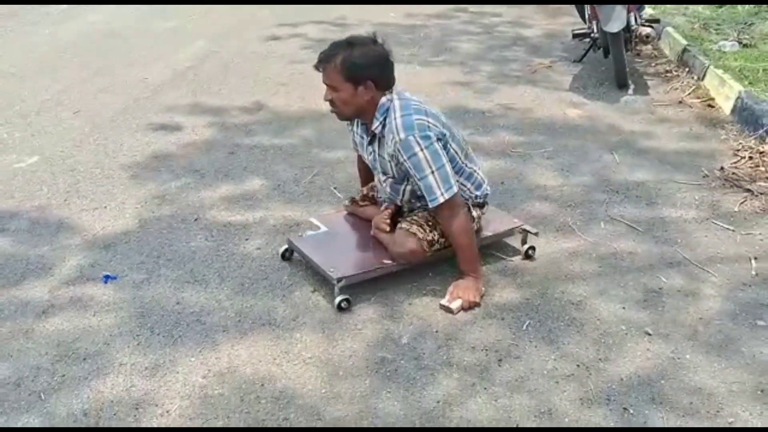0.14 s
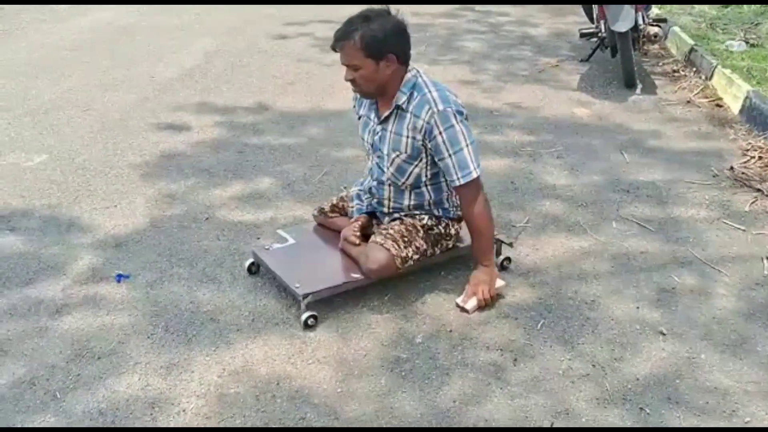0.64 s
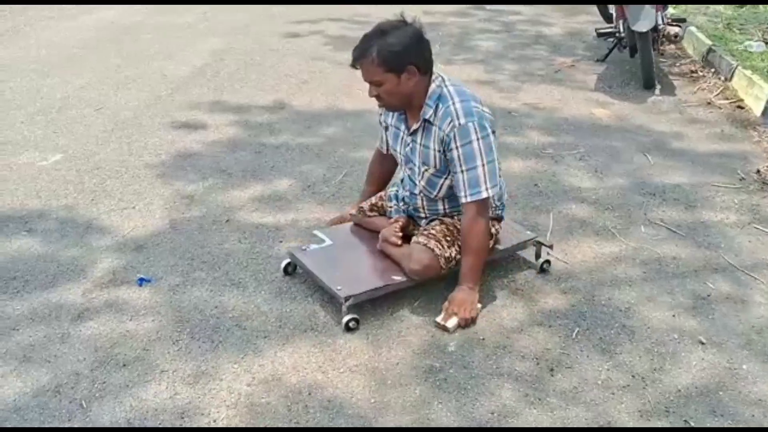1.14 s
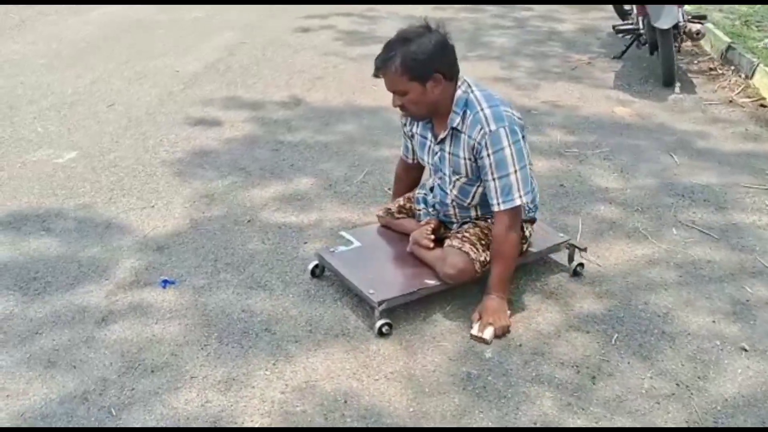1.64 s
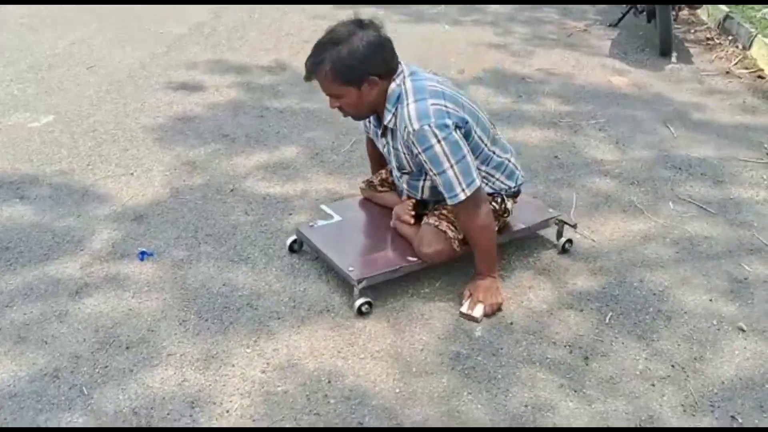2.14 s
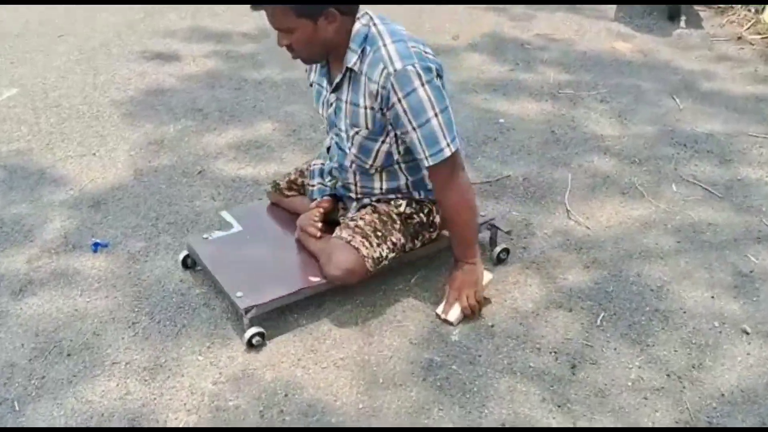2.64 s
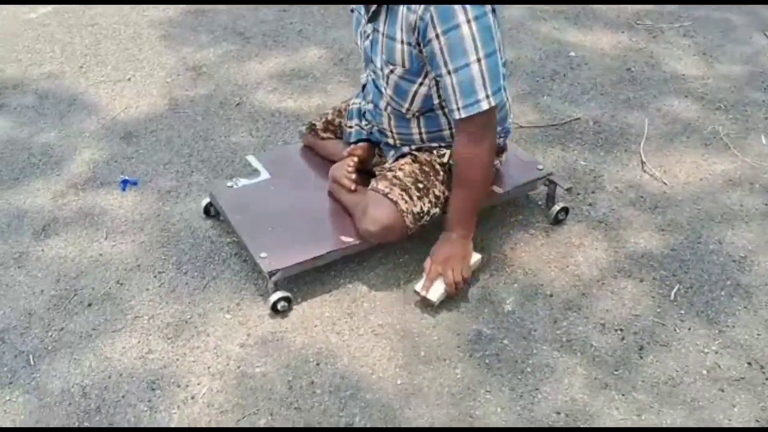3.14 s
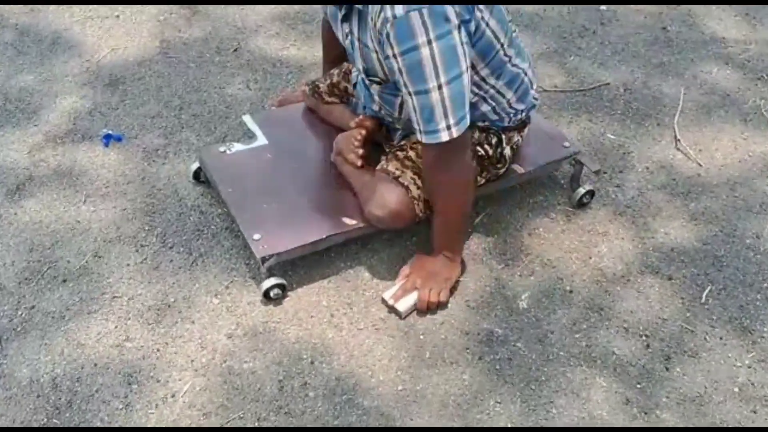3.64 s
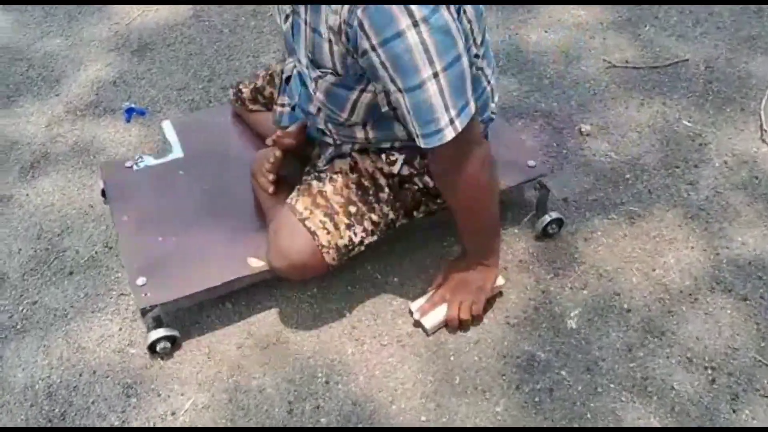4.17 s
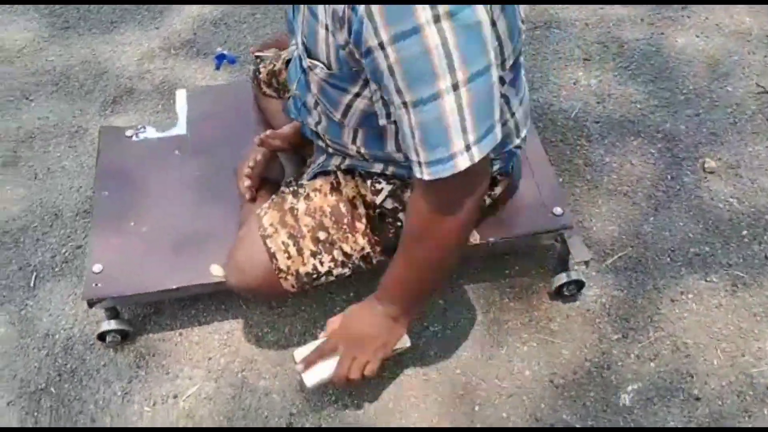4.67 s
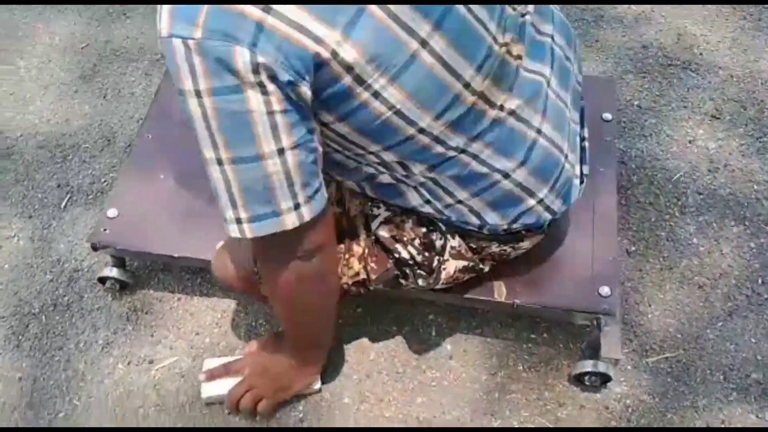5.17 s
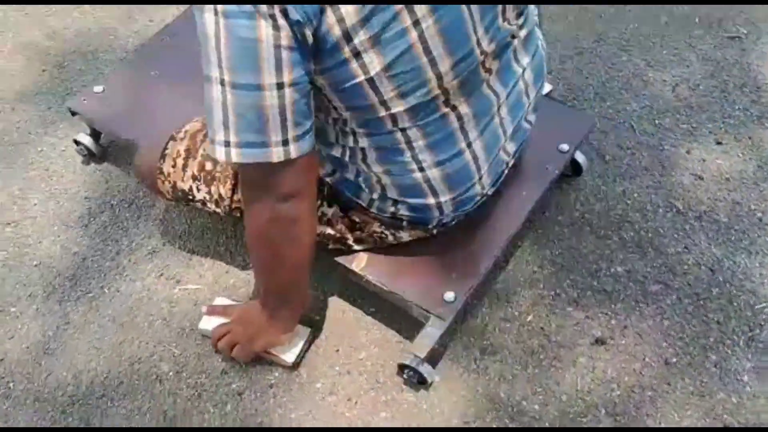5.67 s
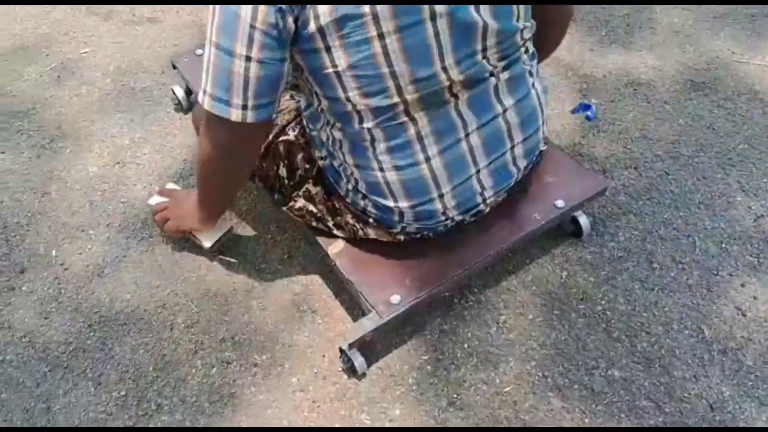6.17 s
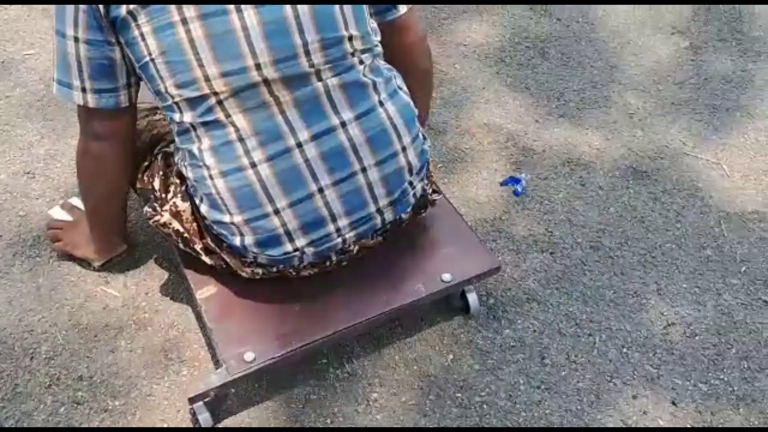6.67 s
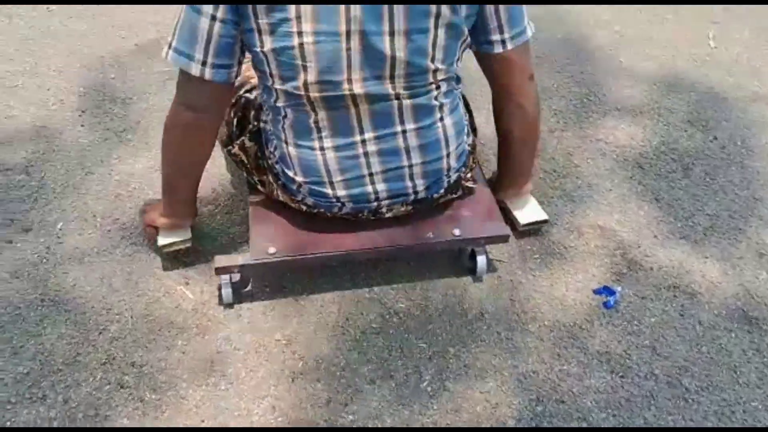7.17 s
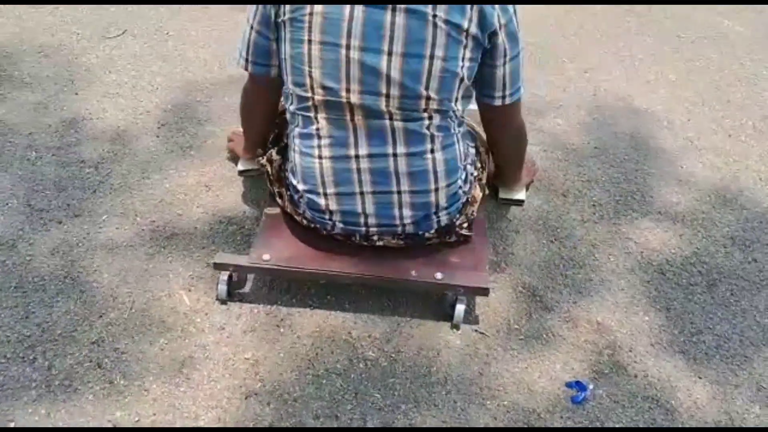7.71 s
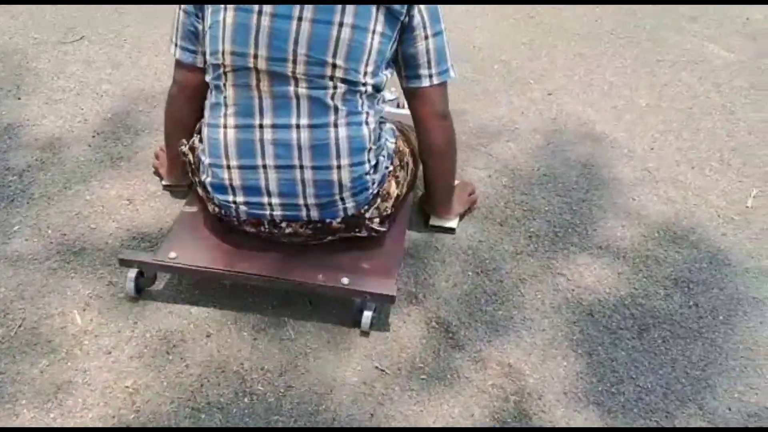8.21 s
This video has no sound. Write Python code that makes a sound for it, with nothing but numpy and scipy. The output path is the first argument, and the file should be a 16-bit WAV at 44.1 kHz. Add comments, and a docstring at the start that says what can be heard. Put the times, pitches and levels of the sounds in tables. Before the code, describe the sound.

Outdoors on a quiet, faintly humming street, close stereo microphones hear a loaded wooden board on four small metal casters. It rolls at once, stops, and in the pause hand blocks click and thud while the frame creaks. Further pushes follow, louder and boomier around the middle, with stones knocking the deck and steel chattering. A last, rattling push begins with the sharpest jolt.

```python
"""A loaded board on four small steel casters is pushed by hand over rough asphalt, in surges with pauses between.
Throughout, a quiet street hums and faint grit ticks. The first push rolls at once: filtered noise, shaken by
random stones, rings the board, its frame and casters, and larger stones add bursts. In the pauses the hand blocks
tap (click, ring and thud) and the frame creaks in short decaying notes. More pushes follow, with soft dips sounding
the hollow note, until the loudest jolt comes as the last push starts. Two close microphone ports hear it all."""
import sys
import numpy as np
from scipy import signal
from scipy.fft import rfft, irfft, next_fast_len
from scipy.io import wavfile
from scipy.ndimage import uniform_filter1d, map_coordinates

SR = 44100
rng = np.random.default_rng(int(sys.argv[2]) if len(sys.argv) > 2 else 0)


def volts_from_db(level):
    """Convert decibel levels to linear amplitude ratios."""
    exponent = np.asarray(level, float) / 20
    return 10 ** exponent


def to_wav(sig):
    """Store sig (one row per channel, or 1-D mono) as 16-bit WAV at the path in sys.argv[1].

    Samples outside -1..1 are clipped; the rate is SR.
    """
    pcm = np.clip(np.atleast_2d(sig), -1, 1) * 32767
    pcm = np.round(pcm).astype(np.int16)
    wavfile.write(sys.argv[1], SR, pcm.T)  # frames by channels


N = 366912


def unit(x):
    """Normalization: scaled to rms 1."""
    return x / np.sqrt(np.mean(np.abs(x) ** 2) + 1e-20)


def along(points, hz):
    """Logarithmic frequency scale: (Hz, value) points are interpolated along it."""
    f, v = np.transpose(points)
    return np.interp(np.log(hz + 1), np.log(f + 1), v)


def curves(rows):
    """Linear interpolation in time: one curve for each column after the time."""
    s, *columns = np.transpose(rows)
    return [np.interp(np.arange(N) / SR, s, column) for column in columns]


def wobble(rate):
    """Band-limited random modulation: a smooth curve with rate knots a second."""
    knots = rng.standard_normal(int(N * rate / SR) + 4)
    return map_coordinates(knots, [np.arange(N) * rate / SR])


def filtered(x, response):
    """Linear filtering: the spectrum times a complex response of frequency."""
    m = next_fast_len(N + SR // 2)
    return irfft(rfft(x, m) * response(np.fft.rfftfreq(m, 1 / SR)), m)[..., :N]


def modes(table):
    """Modal superposition: a causal sum of resonances that keeps the power of white noise."""
    def response(f):
        total = 0
        for k, (centre, width, db) in enumerate(table):
            resonance = 1j * f * width / (centre * centre - f * f + 1j * f * width)
            total = total + (-1) ** k * volts_from_db(db) * resonance
        return unit(total)
    return response


def patchy(x, depth_db):
    """Time-varying filtering: other bands stand out for a while, drawn at random."""
    z = signal.stft(x, nperseg=256)[2]
    field = uniform_filter1d(rng.standard_normal(z.shape), size=3, axis=-2)
    field = uniform_filter1d(field, size=18, axis=-1)
    return signal.istft(z * volts_from_db(depth_db * unit(field)), nperseg=256)[1][..., :N]


# street background spectrum: pitch_hz [Hz], level_db [relative dB per Hz]
STREET_SPECTRUM = [(15, -43), (25, -5.5), (92, -2.5), (256, -22), (714, -35.5), (988, -39.5), (1520, -33.5),
                   (2480, -32), (2690, -45), (5570, -35.5), (16000, -52)]
# left-right correlation of the background: pitch_hz [Hz], likeness [0-1]
STREET_LIKENESS = [(100, 0.5), (6000, 0.06)]
# slow coming and going of the hum: start_s [s], level_db [dB]
HUM_DRIFT = [(1, 0.5), (3.5, -4.5), (7.7, 1)]


def street():
    """Partial coherence: mid and side noise make far traffic hum and faint hiss, slowly wavering."""
    level_db = -59.5  # rms of the mid signal before the wavering
    angle = lambda hz: np.arccos(np.clip(along(STREET_LIKENESS, hz), -1, 1)) / 2
    pair = patchy(rng.standard_normal((2, N)), depth_db=3)
    spectrum = lambda hz: volts_from_db(along(STREET_SPECTRUM, hz)) * [np.cos(angle(hz)), np.sin(angle(hz))]
    mid, side = filtered(pair, spectrum)
    waver_db = 3 * wobble(5)
    both = volts_from_db(level_db + waver_db) * np.array([mid + side, mid - side]) / np.std(mid)
    hum = filtered(both, lambda hz: 1 / (1 + (hz / 300) ** 4))
    return both + (volts_from_db(curves(HUM_DRIFT)[0]) - 1) * hum


def thrum():
    """Amplitude modulation: deep noise swells with the rolling and differs from port to port."""
    noise = rng.standard_normal((2, N))
    low = filtered(noise, lambda hz: 1 / (1 + (hz / 100) ** 3) * hz / (hz + 60))
    return volts_from_db(-25.5) * boom_and_steel()[0] * unit(low)


# delay of the right port after the left, one value per wheel: lag_ms [ms]
WHEEL_LAG_MS = [.02, .08, .17, .27]


def ports(wheels):
    """Time-difference stereo: both ports hear every wheel, each with its own lag."""
    lag_s = np.array(WHEEL_LAG_MS)[:, None] / 1000
    # half the lag is an advance at the left, half a delay at the right
    left = filtered(wheels, lambda hz: np.exp(1j * np.pi * hz * lag_s))
    right = filtered(wheels, lambda hz: np.exp(-1j * np.pi * hz * lag_s))
    return np.array([left.sum(axis=0), right.sum(axis=0)])


# decay of scattered sound between board and road: pitch_hz [Hz], t60_s [s]
GAP_T60 = [(200, 0.13), (10000, 0.02)]
# its share of the sound: pitch_hz [Hz], level_db [dB]
GAP_SHARE = [(250, -24), (1100, -10), (2500, -3.5), (11000, 0.5)]


def gap(x):
    """Diffuse reverberation: sound scattered between board and road differs at each port."""
    hz, t, z = signal.stft(rng.standard_normal((len(x), 2, SR // 8)), SR, nperseg=128)
    fading = volts_from_db(-60 * t / along(GAP_T60, hz)[:, None])
    tail = signal.istft(z * fading, SR, nperseg=128)[1]
    tail = tail / np.linalg.norm(tail, axis=-1, keepdims=True)
    wet = signal.fftconvolve(x[:, None], tail, axes=2)[..., :N].sum(axis=0)
    return filtered(wet, lambda f: volts_from_db(along(GAP_SHARE, f)))


def stones(per_s, spread_db):
    """Poisson process: random bumps per wheel, their heights spread exponentially in dB up to a cap."""
    where, size = rng.random((2, len(WHEEL_LAG_MS), N))
    height_db = np.minimum(-spread_db * np.log(size + 1e-9), 1.1 * spread_db)
    return (where < per_s / SR) * volts_from_db(height_db)


def chatter(bumps, t60, rise, steady):
    """Impulse excitation: loose parts shake after each bump and settle, over a steady grind."""
    t = np.arange(SR // 8) / SR
    settling = volts_from_db(-60 * t / t60) * (1 - np.exp(-t / rise))
    shake = signal.fftconvolve(bumps, settling[None], axes=1)[:, :N]
    return (unit(shake) + steady) * rng.standard_normal(bumps.shape)


def bursts(times, peaks_db, t60, rise, push=0):
    """Exponential decay: dying puffs of noise, each on one wheel; push adds a one-sided shove."""
    out, t = np.zeros((len(WHEEL_LAG_MS), N + SR)), np.arange(SR // 10) / SR
    for k, (s, db) in enumerate(zip(times, peaks_db)):
        envelope = volts_from_db(db - 60 * t / t60) * (1 - np.exp(-t / rise))
        puff = envelope * (push + rng.standard_normal(len(t)))
        out[k % len(WHEEL_LAG_MS), round(s * SR):][:len(t)] += puff
    return out[:, :N]


def grit():
    """Granular contact: grains under the wheels give thin, dull ticks, 16 a second over all wheels."""
    grains = stones(per_s=16 / len(WHEEL_LAG_MS), spread_db=-0.5)  # nearly equal heights
    ticks = volts_from_db(-83) * chatter(grains, t60=0.022, rise=.001, steady=0)
    return filtered(ticks, lambda f: 1j * f / (1500 + 1j * f) / (1 + 1j * f / 9000))


# slips of the loaded frame, one joint per row: pitch_hz [Hz], t60_s [s],
# slips [list of start_s [s], level_db [dB]]
FRAME_SLIPS = [(1724, 0.057, [(1.36, -55), (1.38, -52), (1.412, -54.5), (1.703, -49.5), (1.765, -56.5),
               (1.83, -62)]), (1900, .04, [(2.955, -35.5), (2.97, -43.5), (3.0, -39.5), (3.03, -40.5),
               (3.046, -45), (3.065, -43.5), (8.141, -41.5)]), (2720, .018, [(1.2495, -42), (8.074, -33),
               (8.085, -38), (8.101, -34)])]


def creak():
    """Stick-slip friction: each slip snaps and rings a joint briefly, never quite on the same note."""
    rise_s, rough = .0005, .4  # onset time; share of noise beside the note
    out, t = np.zeros(N + SR), np.arange(SR // 10) / SR
    for hz, t60, rows in FRAME_SLIPS:
        for (s, db), chance in zip(rows, rng.standard_normal(len(rows))):
            note = np.sin(2 * np.pi * hz * (1 + 0.019 * chance) * t)
            note = note + rough * rng.standard_normal(len(t))
            out[round(s * SR):][:len(t)] += volts_from_db(db - 60 * t / t60) * (1 - np.exp(-t / rise_s)) * note
    return out[:N]


# modes of the loaded board, here and in board(): pitch_hz [Hz], width_hz [Hz], level_db [relative dB]
HOLLOW_MODES = [(275.6, 35, 0)]  # hollow note
BOOM_MODES = [(323.2, 67, -0.88)]  # main boom
RIB_MODES = [(457.5, 122, -6), (610, 108.7, 4), (678, 211, -1)]  # stiffer ribs
# hand blocks and grit: start_s [s], level_db [dB before the offset of each part],
# thud_db [dB over that level], spot [0 frame to 1 caster]
TAP_EVENTS = [(0.845, -42, -14, 0.58), (1.0036, -35.5, 0, 0.075), (1.0643, -38.5, -1, 0.71),
              (1.0742, -24.5, -7.5, 0.085), (1.1248, -44, 7.5, 0.08), (1.1697, -40, -5, 0.031),
              (1.2491, -41.5, -4, 0.13), (1.1, -36.5, 4.5, 0.36), (1.2044, -42, 5.5, .3),
              (1.2329, -45, 12, .6), (3.1407, -45, 1.5, 0.47), (3.2387, -33.5, -34, 0.4),
              (3.246, -34, -32, 0.44), (3.4741, -42, -34, 0.024), (3.5214, -41, -14, 0.034),
              (3.6502, -45, -26, 0.27), (3.776, -39, -35, 0.57), (3.8029, -39, -35, 0.35),
              (4.7721, -42, -8, 0.61), (4.9772, -42.5, 0.5, 0.05009), (5.0074, -29, -9.5, 0.14),
              (5.0475, -34.5, -21, 0.13), (5.0939, -40.5, -34, 0.33), (5.3033, -41.5, -14, 0.32),
              (5.3693, -28, -24.5, 0.72), (6.4133, -38.5, -10.5, 0.109), (6.5412, -36, 5.5, 0.13),
              (6.567, -50, 21.5, 0.11), (7.612, -40.5, -24, 0.73), (7.795, -34, -11.5, 0.045),
              (7.8387, -30.5, -31, 0.83), (7.9001, -37.5, -11, 0.26), (7.9962, -33.5, 1, 0.071),
              (8.114, -31.5, -26, 0.58), (8.153, -34.5, -21, .7)]
# what a tap rings: pitch_hz [Hz], frame_db [dB when the frame is struck],
# caster_db [dB when a caster is struck], t60_s [s]
TAP_MODES = [(1685, -3, -39, 0.044), (2187, -8.5, -29, 0.067), (2963, -15.5, -8, 0.047),
             (3750, -1.5, -9, 0.012)]


def taps():
    """Impact response: hand blocks land and grit snaps in a sharp click, a short rough ring, a dull thud."""
    s, db, thud_db, spot = np.transpose(TAP_EVENTS)
    click = bursts(s, db - 10 + 9 * spot, t60=0.011, rise=0.00011)
    click = filtered(click, lambda f: 1j * f / (900 + 1j * f))
    thud = bursts(s, db + thud_db, t60=0.049, rise=0.0015)
    thud = filtered(thud, modes(HOLLOW_MODES + BOOM_MODES + RIB_MODES))
    ring, t = np.zeros(N + SR), np.arange(SR // 10) / SR
    hz, frame_db, caster_db, t60 = np.transpose(TAP_MODES)
    fading = volts_from_db(-60 * t / t60[:, None]) * np.sin(2 * np.pi * np.outer(hz, t))
    chances = rng.standard_normal((len(s), len(hz)))
    for at, peak_db, share, chance in zip(s, db, spot, chances):
        level = volts_from_db(frame_db + share * (caster_db - frame_db) + 2 * chance)
        ring[round(at * SR):][:len(t)] += volts_from_db(peak_db - 9.0) * (level @ fading)
    # fast random modulation roughens the ring
    click[1] += ring[:N] * (1 + 1.2 * unit(wobble(630)))
    return click + thud


# short shifts of the board between pushes: start_s [s], length_s [s], level_db [dB of board boom],
# steel_db [dB of steel rattle over the boom]
BOARD_SHIFTS = [(0.857, 0.1, -66, -2), (0.999, 0.24, -48.5, -14), (2.973, 0.049, -65.5, 5.5),
                (3.142, 0.054, -51, -9.5), (3.502, 0.044, -56.5, -4.5), (3.84, 0.031, -64.5, -21),
                (4.623, 0.014, -27.5, -32), (4.941, 0.14, -62, 1), (6.162, 0.016, -43, -34),
                (6.422, 0.086, -58.5, 1.5), (6.55, 0.032, -36.5, -54), (7.785, 0.053, -59, -4.5),
                (7.903, 0.14, -52, -1)]


def shifts():
    """Unequal damping: boom and steel start quickly and sag slightly, and steel lingers after the wood."""
    rise, sag, boom_fall, steel_fall = 713, 2.5, 407.5, 138.5  # dB per s
    t, boom, steel = np.arange(N) / SR, 0, 0
    for start, length, db, steel_db in BOARD_SHIFTS:
        held_db = db - rise * np.maximum(0, start - t) - sag * np.clip(t - start, 0, length)
        after = np.maximum(0, t - start - length)
        boom = boom + volts_from_db(held_db - boom_fall * after)
        steel = steel + volts_from_db(held_db + steel_db - steel_fall * after)
    return np.array([boom, steel])


# each push of the arms: start_s [s], rise_s [s to full speed], stop_s [s],
# level_db [dB of board boom before the swell], steel_db [dB of steel over the boom before loosening]
ARM_PUSHES = [(.01, 0.39, 0.7, -30.5, -7), (2.226, 0.11, 2.96, -30, -10), (3.883, 0.17, 4.613, -23, -14),
              (5.365, 0.19, 6.04, -22, -13.5), (6.707, 0.16, 7.504, -25.5, -11),
              (8.136, 0.2, 8.74, -25.5, -1.5)]


def pushes():
    """Speed law of rolling noise: speed rises, holds, coasts and halts; the steel shakes ever looser."""
    db_per_decade, swell_db = 27, 4  # boom per tenfold speed; extra at mid-push
    coast_s, halt_s = 0.36, 0.017  # slowing down; how fast the wheels start and stop
    break_speed, halt_speed = 0.082, 0.28  # share of speed as the wheels break free; as they catch
    loosen_db = 3  # the steel gains this much on the boom from start to stop
    # faint rolling leads in and out of a push
    creep_db, creep_steel_db, creep_db_per_s = -26, 8, 371
    t, boom, steel = np.arange(N) / SR, 0, 0
    ease = lambda since, length: np.sin(np.pi / 2 * np.clip(since / length, 0, 1))
    for start, rise, stop, db, steel_db in ARM_PUSHES:
        done = np.clip((t - start) / (stop - start), 0, 1)
        speed = (break_speed + (1 - break_speed) * ease(t - start, rise)) * ease(t - start, halt_s)
        speed = speed * (halt_speed + (1 - halt_speed) * ease(stop - t, coast_s)) * ease(stop - t, halt_s)
        roll = speed ** (db_per_decade / 20) * volts_from_db(db + swell_db * np.sin(np.pi * done))
        outside = np.maximum(0, np.maximum(start - t, t - stop))
        creep = volts_from_db(db + creep_db - creep_db_per_s * outside)
        boom = boom + roll + creep
        steel = steel + volts_from_db(steel_db + loosen_db * (done - 1.5)) * (roll + volts_from_db(creep_steel_db) * creep)
    return np.array([boom, steel])


def boom_and_steel():
    """Level ratio: rolling strength as a gain, and the steel's level over it in dB."""
    boom, steel = pushes() + shifts() + 1e-9
    return boom, 20 * np.log10(steel / boom)


def rolling():
    """Roughness excitation: the same stones shake wood, frame and casters, each settling at its own speed."""
    boom, steel_db = boom_and_steel()
    bumps = stones(per_s=30, spread_db=6.0)
    # small grit snaps in the steel without moving the board
    snaps = stones(per_s=23, spread_db=6.0)
    wood = volts_from_db(-12.5) * chatter(bumps, t60=0.054, rise=0.0009, steady=0.41)
    # the frame lies between wood and casters, so it follows both
    frame = chatter(bumps + 0.66 * snaps, t60=0.021, rise=0.0012, steady=0.13)
    frame = volts_from_db(0.81 * steel_db - 16.5) * patchy(frame, depth_db=5)
    forks = chatter(0.96 * bumps + snaps[::-1], t60=0.027, rise=0.0022, steady=0.14)
    forks = volts_from_db(steel_db - 13.5) * patchy(forks, depth_db=6)
    ticks = chatter(stones(per_s=110, spread_db=5), t60=0.005, rise=0.0001, steady=0)
    ticks = volts_from_db(steel_db - 20) * ticks
    return boom * np.array([wood, frame + ticks, forks + ticks])


# larger stones under a wheel: start_s [s], level_db [dB before the offset of each part],
# knock_db [dB of board knock over that level]
STONE_JOLTS = [(0.2367, -21.5, -4), (0.419, -19, -2), (2.3388, -22.5, 3.5), (2.396, -24.5, 7),
               (2.4296, -23.5, 3.5), (2.5346, -22.5, -11.5), (2.601, -26.5, -5), (2.649, -14.5, -4.5),
               (2.6934, -19.5, 0), (2.78, -12, -2.5), (2.83, -25.5, -2.5), (3.9384, -16, -6),
               (4.0333, -13, -6.5), (4.1113, -11, 4.5), (4.2013, -24, 17), (4.2491, -15, -5.5),
               (4.441, -19, -0.5), (4.4726, -19, -4), (4.495, -16.5, 1.5), (4.606, -26, -4.5),
               (4.6444, -23.5, -4), (5.3938, -17, 3.5), (5.456, -22.5, 5), (5.499, -27.5, 7),
               (5.594, -13, 10.5), (5.62, -21, 10.5), (5.7342, -21, 9.5), (5.7606, -13, -4),
               (5.8175, -18, -24), (5.9228, -15, -1.5), (6.7419, -39, 12), (6.7772, -27.5, 7),
               (6.81, -43, -1), (6.908, -23.5, 5), (6.931, -22.5, 3.5), (6.948, -13, -2.5),
               (6.9726, -19.5, 11), (7.011, -14, 3.5), (7.087, -18, 6.5), (7.12, -15, 1.5),
               (7.153, -17.5, -4), (7.169, -19.5, 5.5), (7.2864, -17, 3), (7.4628, -25, -12.5),
               (8.2652, -5.5, -4)]


def jolts():
    """Impulsive excitation: a larger stone knocks the wood and cracks through frame and casters."""
    s, db, knock_db = np.transpose(STONE_JOLTS)
    wood = bursts(s, db + knock_db + 0.5, t60=0.0032, rise=0.00023, push=0.52)
    frame = bursts(s, db - 6.5, t60=0.034, rise=0.0031)
    frame = frame + bursts(s, db + 0.99 * knock_db - 3.0, t60=0.0025, rise=0.0001, push=0.88)
    forks = bursts(s, db - 10.5, t60=0.046, rise=0.00066)
    return np.array([wood, frame, forks])


# soft dips in the road: start_s [s], level_db [dB before a common gain of 9 dB]
ROAD_DIPS = [(3.94, -16), (4.011, -16.5), (4.214, -18), (5.397, -16.5), (5.459, -11.5), (5.526, -13.5),
             (5.611, -7.5), (6.854, -22.5), (6.928, -17.5), (8.197, -25)]


def dips():
    """Free damped vibration: a soft dip swells the hollow note of the board, which then dies away."""
    rise_s, t60_s = .007, .09
    out, t = np.zeros(N + SR), np.arange(SR // 5) / SR
    for (s, db), chance in zip(ROAD_DIPS, rng.standard_normal(len(ROAD_DIPS))):
        note = np.sin(2 * np.pi * HOLLOW_MODES[0][0] * (1 + 0.02 * chance) * t)
        envelope = volts_from_db(db + 9.0 - 60 * t / t60_s) * (1 - np.exp(-t / rise_s))
        out[round(s * SR):][:len(t)] += envelope * note
    return out[:N]


# posture: start_s [s], lean [rider on the deck, back -1 to forward 1],
# turn [how far the tail is turned to the microphone, 1 most; negative the other way]
LEAN_AND_TURN = [(.4, 0.5, 0.5), (2.6, 0.53, 0.2), (4.25, 0.17, 0.3), (5.7, 0.35, -.4), (6.85, -0.54, 0.87),
                 (7.25, 1, 0.8), (8.25, -0.87, 0.7)]
# hollow note, deck, ribs, frame, forks, ball races, a row each:
# level_db [dB gain of the part; the main boom has -2.5], per_lean [dB per lean],
# per_turn [dB per turn], per_db [dB per dB of a louder, nearer push]
PART_LEVELS = [(-6.5, -5, 2.5, 0.54), (-8.5, 0, 6.5, 0.095), (-2, 3.5, -3, -0.21), (-2.5, 7, 7.5, -0.35),
               (-4, 1, -3, -1), (-5, 5, -0.5, 0.13)]


def heard_parts():
    """Directivity and loading: gain of each part in dB from lean, turn and nearness of the push."""
    start, _, stop, boom_db, _ = np.transpose(ARM_PUSHES)
    near_db, = curves(np.transpose([(start + stop) / 2, boom_db - boom_db.mean()]))
    lean, turn = curves(LEAN_AND_TURN)
    return [db + per_lean * lean + per_turn * turn + per_db * near_db
            for db, per_lean, per_turn, per_db in PART_LEVELS]


# modes of deck, steel frame, caster forks and ball races: pitch_hz [Hz], width_hz [Hz], level_db [relative dB]
DECK_MODES = [(138, 33, -4), (198.4, 58, -4)]
FRAME_MODES = [(882, 120, -3), (1204, 240, 1.5), (1703, 170, 0.5), (2200, 290, 0)]
FORK_MODES = [(3076, 190, -1.5), (3770, 1000, -1.5), (4840, 580, -3.5)]
RACE_MODES = [(5940, 1500, 0.22), (7750, 2100, -0.89), (10020, 1300, -0.89), (12040, 560, 1.3)]


def board():
    """Modal resonance: the shaking rings through each part, heard as the board is turned and loaded."""
    wood, frame, forks = rolling() + jolts()
    hollow_db, deck_db, ribs_db, frame_db, fork_db, race_db = heard_parts()
    ring = lambda shake, table, db: volts_from_db(db) * filtered(shake, modes(table))
    wheels = ring(frame, FRAME_MODES, frame_db)
    wheels = wheels + ring(forks, FORK_MODES, fork_db) + ring(forks, RACE_MODES, race_db)
    # the wooden deck sounds as one source
    wood = wood.sum(axis=0)
    wheels[1] += ring(wood, DECK_MODES, deck_db) + ring(wood, BOOM_MODES, -2.5)
    wheels[1] += ring(wood, HOLLOW_MODES, hollow_db) + dips() + ring(wood, RIB_MODES, ribs_db)
    return wheels


def scene():
    """Superposition: board, hand blocks, grit, creak and street add at the two ports."""
    wheels = board() + taps() + grit()
    scattered = gap(wheels)
    wheels[1] += creak()  # heard without scattering
    balance = volts_from_db([[.1], [-.1]])
    return (ports(wheels) + scattered) * balance + thrum() + street()


def low_pass(x):
    """Removes everything above the highest recorded frequency."""
    return signal.sosfilt(signal.butter(12, 16430, fs=SR, output="sos"), x)


def record(dry):
    """Band limitation: the microphone fades below 35 Hz and above 15.2 kHz."""
    response = lambda hz: hz ** 2 / (hz ** 2 + 35 ** 2) / (1 + (hz / 15200) ** 40)
    mix = filtered(dry, response)
    return low_pass(mix)


dry = scene()
out = record(dry)
to_wav(out)
```